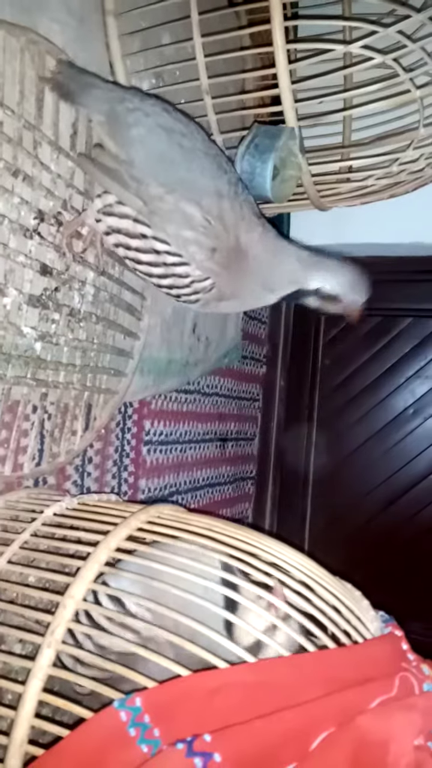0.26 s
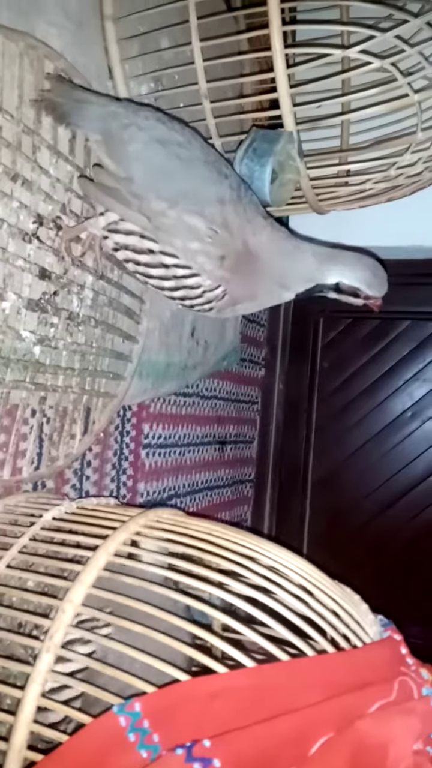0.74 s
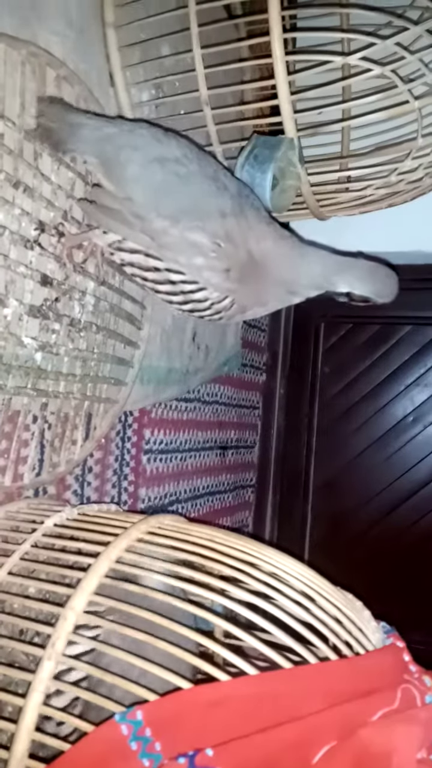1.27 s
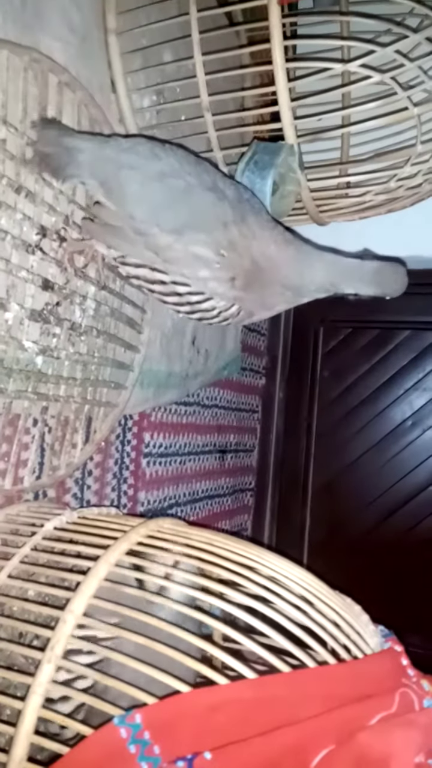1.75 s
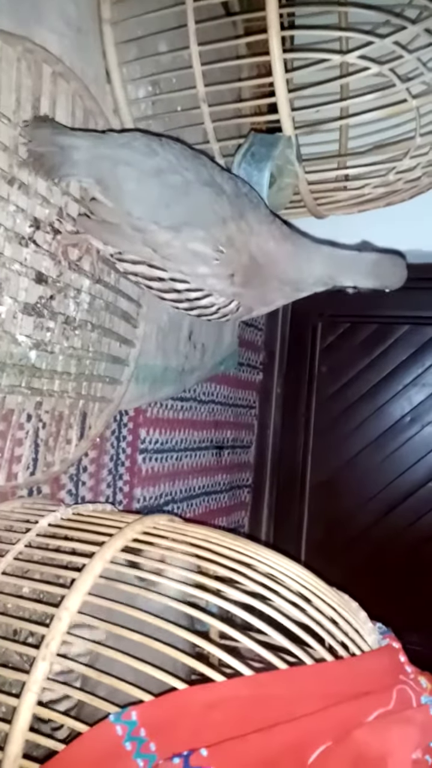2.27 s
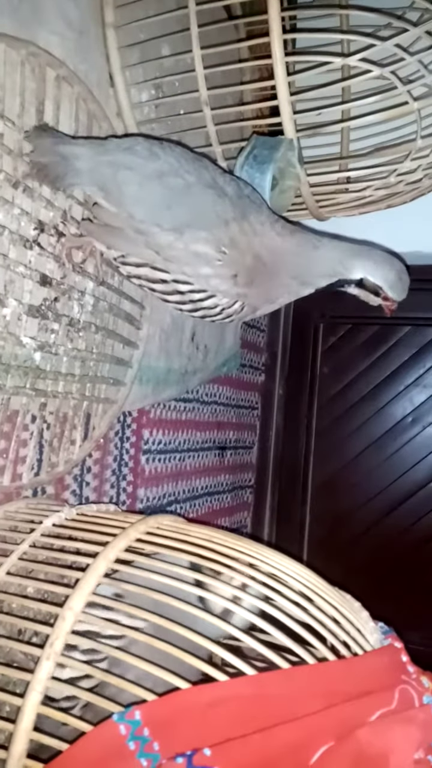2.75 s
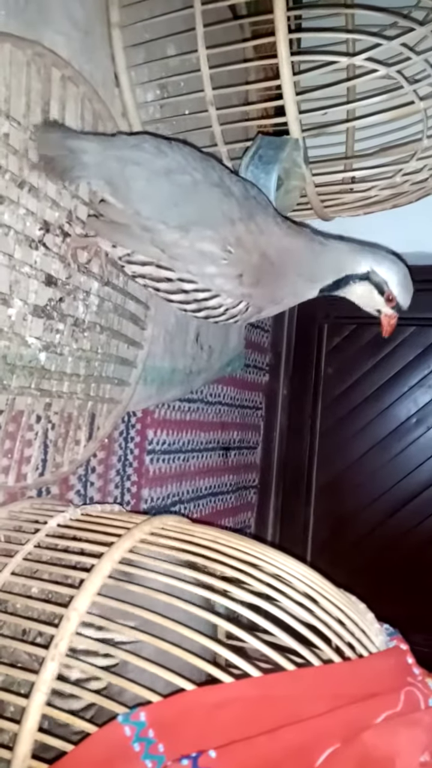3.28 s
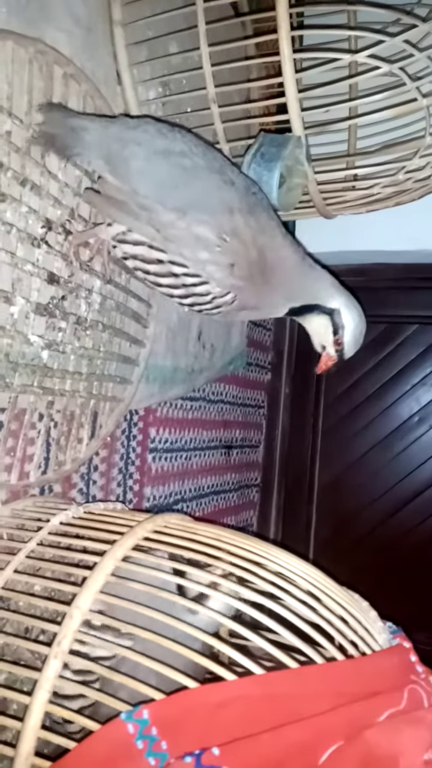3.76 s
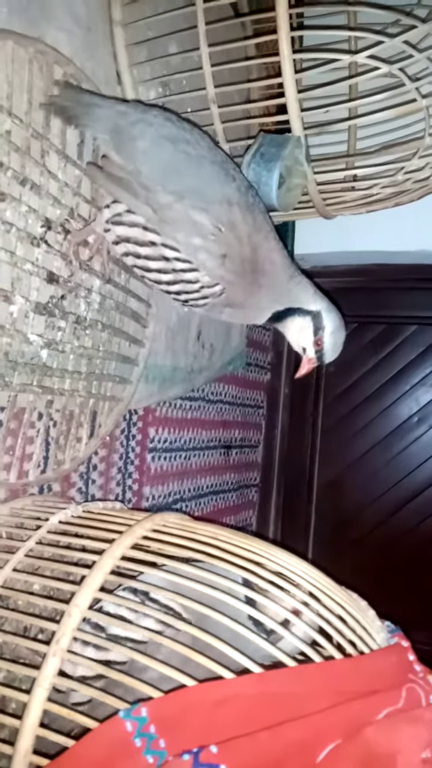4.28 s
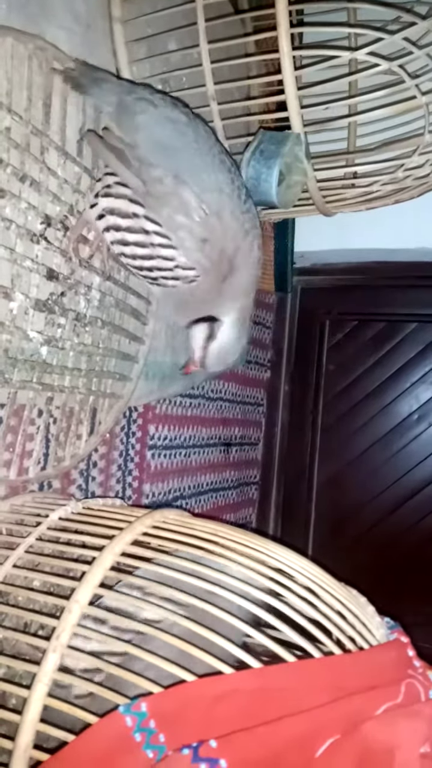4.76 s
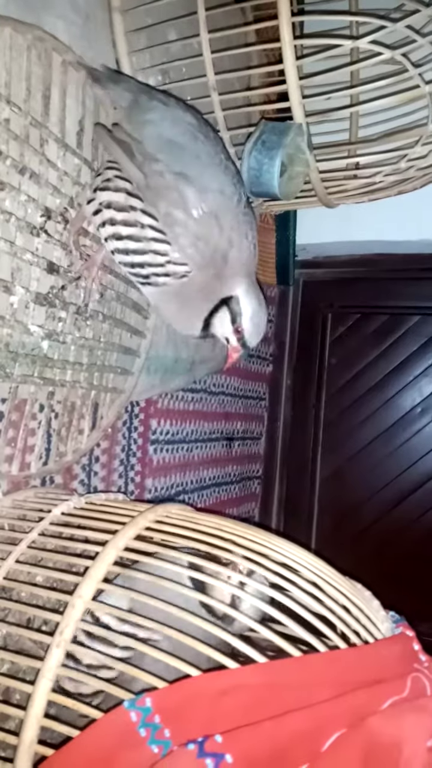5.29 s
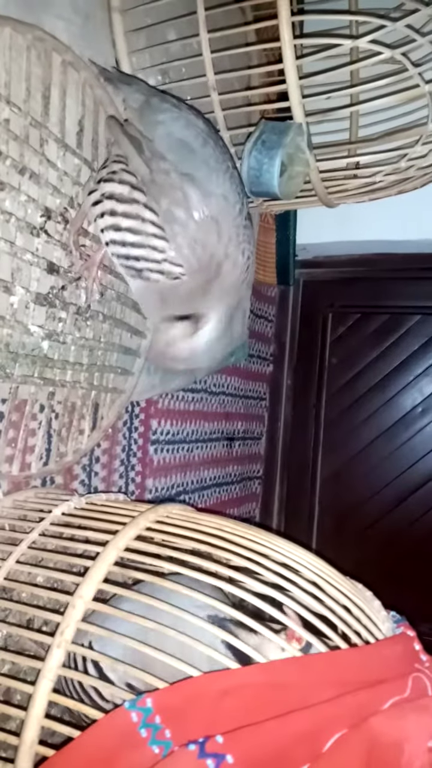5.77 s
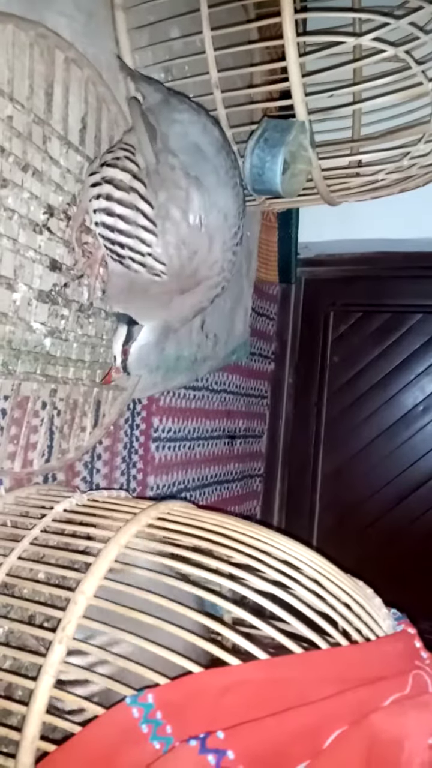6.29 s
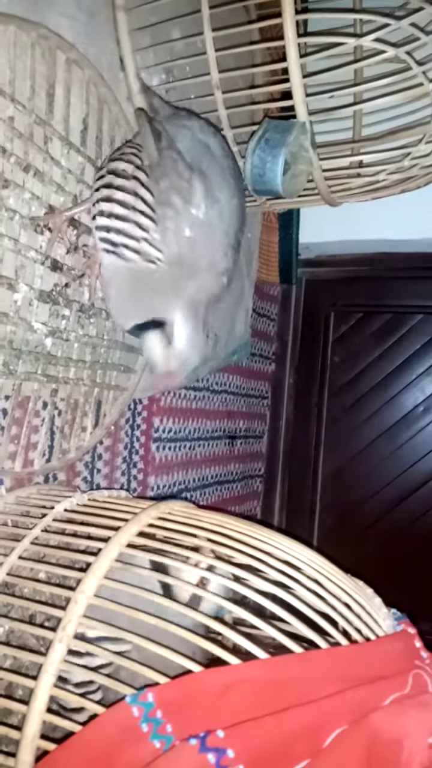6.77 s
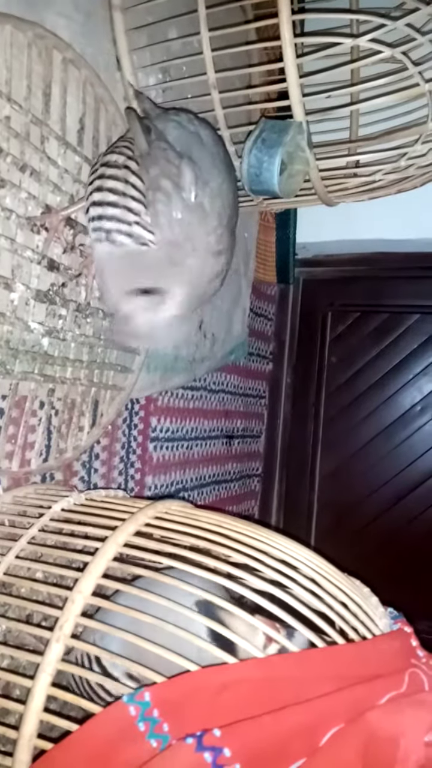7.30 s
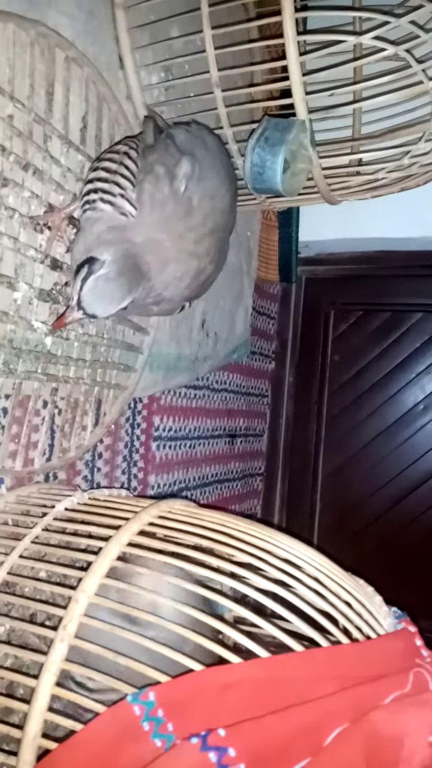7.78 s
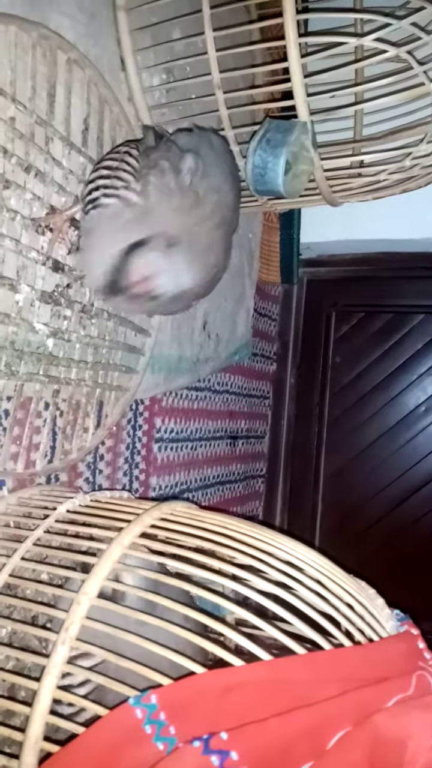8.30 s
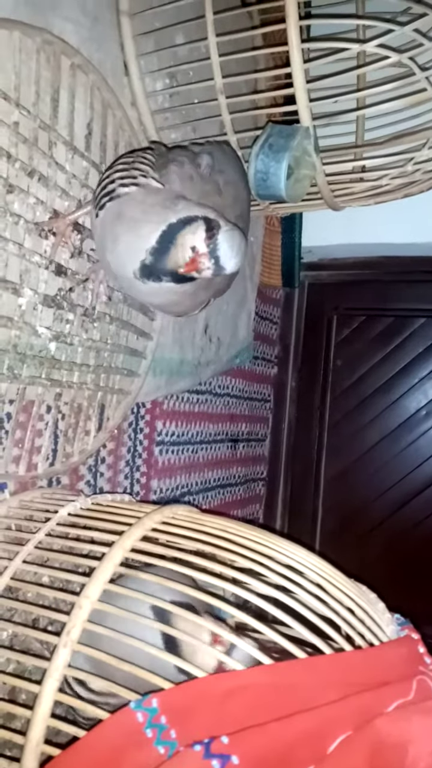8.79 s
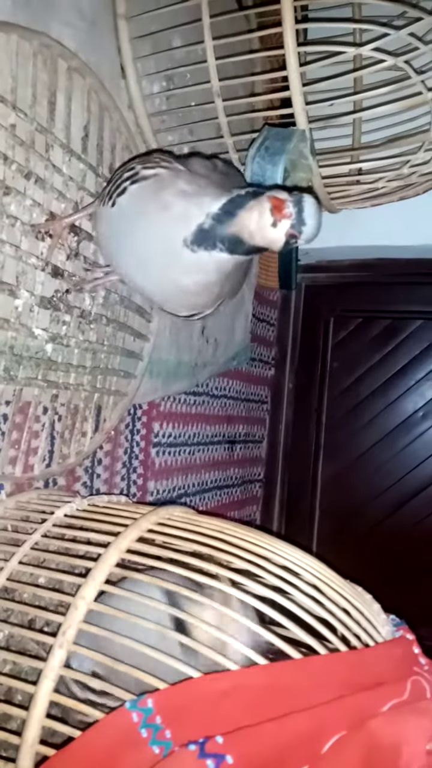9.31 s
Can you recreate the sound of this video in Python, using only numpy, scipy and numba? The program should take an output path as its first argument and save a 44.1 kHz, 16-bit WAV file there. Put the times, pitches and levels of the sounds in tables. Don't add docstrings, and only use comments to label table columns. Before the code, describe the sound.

A partridge clucks in a fast, rough run with short squeaky breaks, then slows and turns away into softer, duller clucks in a small room.

```python
import sys
import numpy as np
from scipy import signal
from scipy.io import wavfile
from scipy.ndimage import uniform_filter1d
from numba import njit

SR = 44100
rng = np.random.default_rng(int(sys.argv[2]) if len(sys.argv) > 2 else 0)


def materialize(psi):
    bounded = np.clip(np.atleast_2d(psi).T, -1, 1)
    quanta = np.round(bounded * 32767).astype(np.int16)
    wavfile.write(sys.argv[1], SR, quanta)


def voltage_ratio(decibels):
    exponent = np.asarray(decibels, float) / 20
    return 10 ** exponent


N = 420713

# (time [s], level [dB], length [s])
RUBS = [(0.298, -79.5, 0.5), (1.178, -74.5, 0.071), (1.684, -76.5, 0.066), (2.579, -76, 0.069),
        (3.185, -73, 0.068), (3.595, -78, 0.049), (4.774, -82, 0.089), (5.799, -79.5, 0.15),
        (8.046, -89, 0.12), (8.383, -81, 0.13), (8.595, -74.5, 0.11), (9.097, -84, 0.09), (9.417, -79, .12)]
# (time [s], peak level [dB], cane pitch [Hz])
TICKS = [(1.305, -59.5, 3180), (2.589, -53.5, 2190), (3.601, -48, 4070), (6.585, -62, 4500),
         (7.559, -59.5, 3279), (7.59, -53, 3980), (7.905, -61.5, 2839), (7.856, -68, 2580),
         (8.011, -52, 1820), (8.376, -59.5, 2200), (8.415, -54, 1574), (8.48, -68.5, 1503),
         (8.625, -52, 4400)]
KNOCK_S, KNOCK_DB, KNOCK_HZ = 4.594, -36.5, 320

# (time [s], cluck treble as the beak turns away [dB], squeal treble with the beak agape [dB], cluck
# pitch [Hz])
FACING = [
    (0, -21.5, -23, 595.9),
    (2.199, -21, -26, 601.7),
    (4.201, -20.5, -21.5, 599.4),
    (4.9, -31.5, -22, 659.9),
    (5.6, -34.5, -16.5, 658.4),
    (6.7, -24, -27, 615),
    (7.2, -38, -15.5, 516.4),
    (8.202, -36.5, -31, 521),
    (9.5, -36.5, -36, 501),
]
# (centre [Hz], width [Hz], level [dB])
BEAK = [(2393, 850, -10), (3250, 640, -4), (4048, 650, -2.5), (5140, 600, 3), (5800, 700, 4),
        (7355, 450, 7.5)]
# (time [s], chest [Hz], chest level [dB], narrow windpipe ring [dB], depth of gap under beak bands [0-1])
THROAT = [(0, 855, 4, -2.5, 0.8), (.7, 870, 2.5, -3, 1), (1.4, 878, 3.5, -11.5, 0.74),
          (2.2, 856.1, 4, -8.5, .7), (3, 846, 5, -8.5, 0.87), (3.7, 853.2, 3.5, -7, .7),
          (4.3, 849.5, 3, -8.5, 0.87), (5, 804, -4, -8, 0.49), (5.5, 798.8, -0.5, -3, 0.48),
          (5.9, 899.4, -2.5, -13, 0.69), (6.6, 801, 1.5, -8, 0.29), (7.039, 758.7, -3, -8.5, .4),
          (7.15, 726, 6.5, -2, 0.4), (7.6, 722, 3, -11, 0.23), (8.15, 780.3, 2, -6.5, 0.19),
          (8.3, 760, 6, -21.5, 0.22), (8.7, 758.6, 8, -6, 0.19), (9.5, 798.3, 1.5, -3.5, .4)]
# (time [s], centre [Hz], level [dB], strength of the fundamental [dB])
MOUTH = [(0, 2320, -22.5, -7), (2, 2337, -17, -6), (3, 2349, -22.5, -8), (4, 2902, -27.5, -10),
         (5.501, 2917, -26.5, -5), (6.6, 3000, -22, -3), (7.03, 3100, -19, -8.5),
         (7.15, 2797, -19.5, -15.5), (7.42, 2206, -12, -14), (7.55, 2600, -26.5, -6.5),
         (8.2, 2272, -18, -7.5), (8.6, 2404, -20.5, -7.5), (8.96, 2850, -20, -10.5), (9.1, 2897, -22, -7.5),
         (9.4, 3143, -22.5, -11), (9.5, 3005, -26, -4.5)]

# (start [s], rise [s], fall [s], peak level [dB],
# windpipe at the peak [Hz])
RUN_CLUCKS = [ (.002, 0.026, 0.017, -30.5, 1250), (.097, 0.0035, 0.021, -39.5, 1915),
              (0.179, 0.015, 0.027, -29, 1574), (.215, .012, 0.044, -44.5, 1596),
              (0.279, 0.024, 0.016, -27.5, 1387), (.461, 0.028, 0.0065, -31, 1759),
              (.54, 0.0024, 0.019, -45.5, 1650), (.565, 0.073, 0.025, -33, 1190),
              (.802, 0.015, .035, -32, 1600), (.84, .015, .02, -38.5, 1557), (.87, 0.031, 0.012, -36, 1242),
              (1.057, 0.0025, 0.047, -35, 1714), (1.155, 0.051, .01, -31, 1276),
              (1.214, 0.028, 0.0093, -30, 1360), (1.391, 0.016, 0.05, -27, 1556),
              (1.463, 0.025, 0.017, -32.5, 1327), (1.65, 0.021, 0.021, -36, 1915),
              (1.762, 0.0052, 0.034, -34, 1735), (1.797, 0.038, 0.016, -29, 1277),
              (1.988, 0.01, 0.05, -33.5, 1591), (2.04, .013, 0.0078, -31, 1787),
              (2.085, .024, 0.02, -32, 1252), (2.278, 0.017, .02, -33, 1217),
              (2.378, 0.0085, 0.062, -44, 1716), (2.437, 0.025, 0.017, -35, 1197),
              (2.603, .012, .022, -39, 1701), (2.66, 0.0028, 0.035, -37, 1900),
              (2.73, 0.045, .022, -30.5, 1252), (2.947, 0.016, 0.028, -33.5, 1218),
                 (3.047, 0.076, .018, -29, 1253), (3.289, 0.018, 0.027, -32.5, 1704),
                 (3.384, 0.045, 0.02, -27, 1283), (3.594, 0.017, 0.016, -31.5, 1650),
                 (3.696, 0.052, .012, -29.5, 1507), (3.754, 0.024, 0.014, -23, 1288),
                 (3.932, 0.016, 0.003, -42, 1772), (4.0, 0.0022, 0.033, -37.5, 1459),
                 (4.045, 0.059, 0.02, -26, 1345), (4.278, 0.011, 0.027, -36.5, 1671),
                 (4.42, 0.0032, 0.024, -34, 1550), (4.622, 0.016, 0.02, -37.5, 1516),
                 (4.729, 0.012, 0.017, -34.5, 1470), (4.986, 0.017, 0.017, -40.5, 1629),
                 (5.169, 0.0024, 0.028, -36, 1522), (5.203, 0.016, .016, -43.5, 1452),
                 (5.424, 0.014, 0.016, -39.5, 1655), (5.586, 0.0023, 0.014, -34.5, 1499),
                 (5.845, 0.014, 0.019, -36.5, 908), (6.03, 0.0029, 0.016, -38.5, 1456),]
# (start [s], rise [s], fall [s], peak level [dB], windpipe at the peak [Hz])
SOFT_CLUCKS = [ (6.336, .003, .02, -36, 1826), (6.545, .018, 0.024, -47, 1899),
               (6.731, .016, 0.0073, -45.5, 1221), (7.0, .016, .03, -41, 1701),
               (7.035, .015, .022, -40.5, 1542), (7.1, .006, 0.07, -44.5, 1527),
               (7.407, .014, 0.025, -41, 1450), (7.503, 0.011, 0.044, -45, 1437),
               (7.556, .035, 0.037, -50.5, 1303), (8.117, .022, .014, -44.5, 1776),
               (8.248, 0.037, 0.036, -46, 1680), (8.513, .008, 0.037, -46.5, 1730),
               (8.604, 0.022, 0.068, -43.5, 1662), (8.683, .022, .018, -46, 1204),
               (8.945, .013, 0.018, -39.5, 1540), (9.03, 0.0058, 0.072, -43.5, 1436),
               (9.09, .043, 0.019, -43.5, 1323), (9.336, 0.025, 0.012, -43, 1528),
               (9.431, 0.016, 0.05, -44.5, 1526), (9.47, .058, 0.014, -39, 1430), ]
# (start [s], rise [s], fall [s], peak level [dB], windpipe at the peak [Hz])
GRUNTS = [ (.35, 0.0052, 0.029, -53, 1384), (1.626, 0.0071, 0.015, -46, 1650),
          (3.859, .018, 0.0099, -47, 1445), (4.49, 0.0045, 0.02, -56, 1601),
          (4.8, 0.008, 0.031, -47.5, 1753), (5.242, 0.0066, 0.023, -53.5, 1791),
          (6.096, .006, 0.024, -57, 1412), (6.805, 0.021, 0.016, -55.5, 1315),
          (7.165, 0.017, .018, -52, 1261), (8.3, 0.016, 0.028, -48, 1506), ]
# (start [s], rise [s], fall [s], peak level [dB], windpipe at the peak [Hz])
OPEN_CLUCKS = [
    (7.8, .034, .016, -44, 1800),
    (7.85, .014, .012, -53, 1593),
    (8.198, .026, 0.034, -43, 1896),
    (9.377, 0.022, 0.052, -43.5, 1940),
]

# (start [s], length [s], from [Hz], to [Hz], level [dB])
CLIMBS = [ (.048, .012, 1479, 1757, -34), (.059, .011, 1799, 2110, -22.5), (.488, 0.02, 1752, 1934, -21),
          (1.003, 0.02, 1593, 1941, -28.5), (1.028, 0.011, 1692, 2100, -29), (1.722, .017, 1684, 1887, -25),
          (2.614, 0.016, 1650, 1993, -27), (3.331, 0.021, 1650, 2130, -31),
          (3.945, 0.027, 1717, 1705, -25.5), (4.365, 0.023, 1585, 1780, -38.5),
          (4.628, 0.023, 2205, 2382, -33), (4.65, 0.021, 1650, 1834, -29), (5.085, .013, 1401, 2053, -30),
          (5.511, 0.00889, 1408, 2092, -40.5), (5.52, .015, 2405, 2647, -33.5),
          (5.942, 0.026, 1542, 2195, -39.5), (6.234, 0.01, 1354, 1864, -28), (6.246, 0.02, 1877, 2115, -29),
          (6.65, 0.024, 1602, 2002, -36), (8.976, 0.017, 1410, 1898, -39.5), ]
# (start [s], length [s], from [Hz], to [Hz], level [dB])
ARCHES = [ (0.068, 0.028, 3050, 2810, -39.5), (.511, 0.007, 3100, 3126, -39),
          (1.74, 0.01408, 3449, 2857, -35.5), (1.756, 0.01312, 2901, 3452, -39),
          (3.351, .016, 3680, 2796, -39.5), (3.366, .015, 2800, 3610, -40.5),
          (3.971, 0.025, 2881, 2770, -39), (4.386, 0.027, 2902, 2551, -35.5),
          (4.674, 0.051, 3667, 4330, -47.5), (5.098, 0.024, 2700, 3250, -31),
          (5.123, .011, 3397, 4753, -46.5), (5.141, 0.024, 4666, 2904, -46.5),
          (5.538, 0.015, 2802, 3202, -40), (5.553, 0.0096, 4408, 4360, -47.5),
          (5.562, 0.013, 3195, 2860, -39.5), (5.964, 0.011, 3300, 3755, -44.5),
          (5.978, .035, 3750, 3650, -54), (6.016, .007, 3600, 1898, -45), (6.269, 0.019, 3064, 3135, -48),
          (6.289, .028, 3850, 3958, -51), (6.316, 0.0077, 3800, 2287, -39.5),
          (6.675, 0.0188, 2577, 3063, -34), (6.698, 0.0233, 3429, 2824, -39.5),
          (8.991, .02, 2650, 3120, -57), (9.01, .018, 3120, 2293, -56), ]
# (start [s], length [s], from [Hz], to [Hz], level [dB])
DROPS = [ (.093, 0.027, 2608, 800, -38.5), (.517, 0.023, 2002, 1485, -24.5), (1.045, 0.02, 1876, 1650, -31),
         (1.769, 0.017, 1996, 1639, -34.5), (2.632, .03, 1957, 1604, -24.5),
         (3.382, 0.0082, 2793, 2008, -42.5), (3.996, 0.01, 2141, 2212, -35.5),
         (4.413, .013, 1986, 1598, -32), (4.727, 0.008, 2903, 2096, -40.5),
         (5.162, 0.01, 2303, 1601, -33.5), (5.574, .017, 2377, 1553, -33),
         (6.021, 0.017, 1785, 1250, -34.5), (6.324, 0.014, 2188, 1772, -28),
         (6.722, 0.015, 2293, 1307, -30), (9.026, 0.015, 1995, 1418, -40), ]
# (start [s], length [s], from [Hz], to [Hz], level [dB])
DUETS = [(1.0, 0.023, 2100, 2702, -40.5), (1.029, 0.024, 3003, 2900, -44.5),
         (1.752, 0.017, 2036, 2255, -31.5), (4.4, .02, 3307, 3606, -49), (4.63, 0.023, 1251, 1498, -44),
         (4.658, 0.027, 3355, 3507, -41), (4.676, 0.012, 2300, 3000, -42),
         (5.099, 0.015, 1856, 2003, -37.5), (5.429, 0.024, 1203, 1857, -42.5),
         (5.515, 0.015, 3220, 3407, -41), (5.592, 0.0081, 2150, 2098, -32.5),
         (6.268, 0.048, 2000, 1950, -55), (6.323, 0.027, 3260, 2899, -45), (6.66, 0.036, 1437, 1511, -43),
         (6.7, .015, 4385, 4110, -48.5), (8.972, .02, 1906, 2702, -53)]
# (start [s], length [s], from [Hz], to [Hz], level [dB])
SONGS = [ (.018, 0.019, 1397, 1254, -31), (.29, .024, 1600, 1346, -27), (.635, 0.026, 1402, 1263, -33),
         (.892, .013, 1352, 1145, -29.5), (.907, 0.0079, 1200, 1153, -32), (1.2, 0.0089, 1261, 1246, -31),
         (1.222, 0.025, 1560, 1300, -30), (1.482, .024, 1450, 1195, -31.5),
         (1.81, 0.029, 1400, 1276, -30.5), (2.0, .025, 1660, 1640, -33.5), (2.103, .012, 1351, 1300, -26),
         (2.116, 0.0091, 1333, 1294, -26.5), (2.45, .009, 1361, 1340, -30.5), (2.46, .012, 1281, 1235, -27),
         (2.773, 0.022, 1319, 1277, -31), (3.117, .022, 1398, 1306, -26.5),
         (3.423, .018, 1351, 1297, -27.5), (3.738, .012, 1498, 1448, -28),
         (3.765, 0.021, 1421, 1298, -28.5), (4.05, .023, 1957, 1909, -38.5),
         (4.073, .015, 1901, 1738, -28.5), (4.094, .009, 1880, 1781, -30.5),
         (4.103, .015, 1424, 1475, -24.5), (4.118, 0.0075, 1355, 1180, -31.5),
         (4.425, .02, 1600, 1050, -37.5), (4.736, .018, 1899, 1200, -36), (5.171, .02, 1601, 1150, -39),
         (5.518, .016, 1700, 1911, -37), (5.588, .013, 1500, 1000, -36.5), (6.736, .017, 1550, 1000, -38),
         (7.565, .045, 1550, 1147, -53.5), (7.58, .04, 1998, 1600, -54), (9.38, 0.051, 1495, 1300, -45.5),
         (9.515, .024, 1698, 1451, -41.5), ]
# (attack share, release share, onset [dB], end [dB], pitch ratio kept at the end)
CLIMB, ARCH, DROP = (1.6, 0.3, -14.5, -9, 0.99), (0.44, 0.2, -7.5, -8, 1), (0.6, 0.5, -7.5, -11.5, 1)
DUET, SONG = (1.8, 1.2, -9.5, -10.5, 1), (1.2, 0.6, -10.5, -11, 0.54)

PIPE_REST_HZ, PIPE_PULL, PIPE_SAG = 1650, 0.79, 0.87
ONSET_DB, END_DB = -21.5, -19.5
SURGE_S, SWELL_DB = 0.023, -10
HOLD_SHARE, HOLD_DB = 0.55, -5.5
CHEST_EVEN_DB, CHEST_LAG, CHEST_MOST_DB = -49, 1, 4.5
GRUNT_CHEST_DB, CHEST_ONSET_DB = -2.5, -6.5
TIGHT_CHEST_DB = -3.5
GRUNT_PITCH, TIGHT_PITCH = 0.83, 1.1
OPEN_CHEST_DB, OPEN_BEAK_DB = -5.5, 6.5
ROUGH_FULL_DB, ROUGH_LAG = -33, 0.6
BEAK_FULL_DB, BEAK_SHARE = -36.5, 0.71


@njit
def svf(x, hz, width):
    y, b, l = np.empty(len(x)), 0., 0.
    for i in range(len(x)):
        g, k = np.tan(np.pi * hz[i] / SR), width / hz[i]
        v = (b + g * (x[i] - l)) / (1 + g * (g + k))
        b, l, y[i] = 2 * v - b, l + 2 * g * v, k * v
    return y


def band(x, hz, width):
    hz = hz * np.ones(N)
    return svf(svf(x, hz, 1. * width), hz, 1. * width)


def highpass(x, hz, order=4):
    return signal.sosfilt(signal.butter(order, hz, "highpass", fs=SR, output="sos"), x)


def even(x, s=0.0042):
    return x / np.sqrt(uniform_filter1d(x ** 2, int(s * SR)) + 1e-18)


def walk(rate):
    k = int(SR / rate)
    return 1.3 * uniform_filter1d(np.repeat(rng.standard_normal(N // k + 1), k), k)[:N]


def follow(table):
    s, *columns = np.transpose(table)
    return [np.interp(np.arange(N) / SR, s, c) for c in columns]


def floor():
    t, noise = np.arange(N) / SR, rng.standard_normal((3, N))
    hand = voltage_ratio(-96 + 3 * walk(9))
    for s, db, length in RUBS:
        hand = hand + voltage_ratio(db) * np.sin(np.pi * np.clip((t - s) / length, 0, 1))
    rub = hand * even(band(noise[0], 150, 150), 0.069)
    hum = voltage_ratio(-86.5) * even(band(noise[1], 1500, 6600), 0.5)
    hiss = voltage_ratio(-94.0) * even(band(noise[2], 14500, 11000), 0.5)
    return rub + hum + hiss


def room(x, low_t60=0.4, high_t60=0.32, split_hz=2600, first_s=0.009):
    t, noise = np.arange(SR // 2) / SR, rng.standard_normal(SR // 2)
    low = signal.sosfilt(signal.butter(2, split_hz, fs=SR, output="sos"), noise)
    high = noise - low
    tail = (low * voltage_ratio(-60 * t / low_t60) + high * voltage_ratio(-60 * t / high_t60)) * (t > first_s)
    return signal.fftconvolve(x, tail / np.sqrt(np.sum(tail ** 2)))[:N]


def phone_knock():
    t, knock = np.arange(SR // 20) / SR, np.zeros(N)
    ring = np.sin(2 * np.pi * KNOCK_HZ * t) * np.exp(-t / 0.0013)
    knock[int(KNOCK_S * SR):][:len(t)] = voltage_ratio(KNOCK_DB) * ring
    return highpass(knock, 130, 2)


def wicker():
    bursts, hz = np.zeros(N), np.interp(np.arange(N) / SR, *np.transpose(TICKS)[::2])
    t = np.arange(SR // 20) / SR
    for s, db, _ in TICKS:
        bursts[int(s * SR):][:len(t)] = voltage_ratio(db) * np.exp(-t / 0.0076)
    crack = rng.standard_normal(N)
    body = even(band(band(crack, hz, 1800), hz, 1800))
    snap = even(band(crack, 1.5 * hz, 3200))
    return bursts * (body + voltage_ratio(-11.5) * snap)


def play(notes, fade_s):
    notes = [np.array(note) for note in sorted(notes)]
    t, columns = np.arange(N) / SR, np.outer(notes[0][0][1:], np.ones(N))
    gain, top_db, age, left = np.zeros(N), np.full(N, -40.), np.zeros(N), np.ones(N)
    starts = [int(note[0, 0] * SR) for note in notes] + [N]
    for note, a, after in zip(notes, starts, starts[1:]):
        b = min(int(note[-1, 0] * SR), N)
        gain[a:b] = np.maximum(gain[a:b], np.interp(t[a:b], note[:, 0], voltage_ratio(note[:, 2])))
        top_db[a:after] = note[:, 2].max()
        age[a:b], left[a:b] = t[a:b] - t[a], t[b - 1] - t[a:b]
        columns[:, a:after] = [np.interp(t[a:after], note[:, 0], c) for c in note.T[1:]]
    columns = uniform_filter1d(columns, int(0.0008 * SR))
    return columns, uniform_filter1d(gain, int(fade_s * SR)), top_db, age, left


def beak(x, facing):
    out = 0
    for hz, width, db in BEAK:
        moving_hz = hz * (1 + 0.038 * walk(14))
        beam = facing ** ((hz - 1500) / 2500)
        ring = even(band(band(x, moving_hz, width), moving_hz, width))
        out = out + voltage_ratio(db + 3.67 * walk(40)) * beam * ring
    return out


def glide(row, register):
    s, length, from_hz, to_hz, db = row
    attack, release, onset_db, end_db, kept = register
    attack = min(attack, 0.95 - release)
    at = lambda share: (s + share * length, from_hz + share * (to_hz - from_hz))
    return [(*at(0), db + onset_db), (*at(attack), db), (*at(1 - release), db),
            (s + length, to_hz * kept, db + end_db)]


def membrane(parts, wobble=0.018, flutter_db=2.0, second_db=-28, half_db=-18, rasp=0.36, rasp_hz=520):
    (hz, _), gain, *_ = play(parts, fade_s=0.0014)
    phase = 2 * np.pi * np.cumsum(hz * (1 + wobble * (walk(600) + walk(120)))) / SR
    tone = np.sin(phase) + voltage_ratio(second_db + 2.8 * walk(160)) * np.sin(2 * phase)
    halves = voltage_ratio(-14.0) * np.sin(phase + phase / 2) + voltage_ratio(-8.5) * np.sin(phase / 2)
    tone += voltage_ratio(half_db + 7.2 * walk(60)) * halves
    flap = np.sin(2 * np.pi * np.cumsum(rasp_hz * (1 + 0.23 * walk(200))) / SR)
    flutter = voltage_ratio(flutter_db * walk(220)) * (1 + rasp * flap)
    return gain * tone * np.sqrt(2) * flutter, gain, flap


def squeals(facing, hiss_db=-19):
    low_notes = [glide(row, CLIMB) for row in CLIMBS] + [glide(row, DROP) for row in DROPS]
    low, low_gain, flap = membrane(low_notes, flutter_db=1.4, rasp=0.26)
    thin, thin_gain, _ = membrane([glide(row, ARCH) for row in ARCHES], half_db=-24, rasp=0.22)
    duet = membrane([glide(row, DUET) for row in DUETS])[0]
    song = membrane([glide(row, SONG) for row in SONGS], wobble=0.022, half_db=-25, flutter_db=1.17,
                    rasp=0.46, rasp_hz=210)[0]
    air = rng.standard_normal(N)
    push = np.roll(uniform_filter1d(low_gain + thin_gain, 350).clip(0), SR // 400)
    throat_air = voltage_ratio(-19.0) * even(band(air, 1850, 260))
    spray = voltage_ratio(-10 + 3.6 * walk(55)) * np.sqrt(push / voltage_ratio(-35.0)) * facing ** 1.54 * (1 + flap)
    spray = spray * even(band(band(air, 12000, 7900), 12000, 7900))
    jet = beak(air, facing) + throat_air + spray
    whistle = highpass(low + thin + duet + song, 800)
    return whistle + np.sqrt(push) * voltage_ratio(hiss_db) * jet


def cluck_shape(row, extra_db=0, pitch=1, open_db=0):
    s, rise, fall, db, hz = row
    db = db - ROUGH_LAG * max(db - ROUGH_FULL_DB, 0)
    from_hz = hz + PIPE_PULL * min(rise / SURGE_S, 1) * (PIPE_REST_HZ - hz)
    peak_s = s + rise
    swell = [(peak_s - SURGE_S, from_hz, db + SWELL_DB)] * (rise > 0.04)
    rows = [(s, from_hz, db + ONSET_DB), *swell, (peak_s, hz, db),
            (peak_s + HOLD_SHARE * fall, hz, db + HOLD_DB), (peak_s + fall, hz * PIPE_SAG, db + END_DB)]
    if rise < 0.0052 and pitch == 1:
        extra_db, pitch = TIGHT_CHEST_DB, TIGHT_PITCH
    shaped = []
    for point in rows:
        chest_db = min(CHEST_LAG * (CHEST_EVEN_DB - point[2]), CHEST_MOST_DB) + extra_db
        chest_db += CHEST_ONSET_DB * (point[0] == s)
        shaped.append((*point, chest_db, pitch, open_db))
    return shaped


def throat_pulses(hz, jitter=0.055, shimmer_db=2.5, weak_db=-5, breath=0.16):
    phase = np.cumsum(hz * (1 + jitter * (walk(350) + walk(60))) / SR)
    cycle = phase.astype(int)
    size = voltage_ratio(shimmer_db * rng.standard_normal(N // 20)[cycle] + weak_db * (cycle % 2))
    shut = np.exp(-(phase % 1) / 0.041)
    hiss = breath * np.exp(-(phase % 1) / 0.6) * rng.standard_normal(N)
    return np.diff(size * (shut + hiss), prepend=0)


def clucks(facing, start_hz, effort=0.12, sag=0.8, dive=4.0, slack=2.5):
    notes = [cluck_shape(row) for row in RUN_CLUCKS + SOFT_CLUCKS]
    notes += [cluck_shape(row, GRUNT_CHEST_DB, GRUNT_PITCH) for row in GRUNTS]
    notes += [cluck_shape(row, OPEN_CHEST_DB, open_db=OPEN_BEAK_DB) for row in OPEN_CLUCKS]
    chest_hz, fill_db, ring_db, gap = follow(THROAT)
    gap = gap.clip(0, 1)
    mouth_hz, mouth_db, base_db = follow(MOUTH)
    (pipe_hz, _, chest_db, pitch, open_db), gain, top_db, age, left = play(notes, fade_s=0.005)

    hz = start_hz * pitch * voltage_ratio(effort * np.minimum(top_db + 43, 0))
    long_pipe = np.minimum(PIPE_REST_HZ / pipe_hz, 1.35) ** slack
    let_go = dive * np.minimum(age / 0.055, 1) * long_pipe * np.exp(-left / 0.015)
    hz = hz * np.exp(-age * (sag + let_go))
    source = throat_pulses(hz)

    sing_db = ring_db - 8 * (pitch > 1.1) + 2.0 * walk(90) + 0.21 * (top_db + 28.5)
    sing = voltage_ratio(sing_db) * even(band(source, pipe_hz, 130))
    broad = voltage_ratio(-0.5) * even(band(band(source, pipe_hz, 750), pipe_hz, 750))
    pipe = even(broad + sing, 0.0089)
    gain = gain * voltage_ratio(1.6 * walk(70) + 1.8 * walk(200))

    fundamental = even(band(band(source, hz, 240), hz, 240)) * voltage_ratio(base_db) / pitch ** 2.5
    chest_ring = band(band(source, chest_hz * (1 + 0.073 * walk(25)), 400), chest_hz, 800)
    chest = even(fundamental + even(chest_ring))

    held = np.maximum(gain / voltage_ratio(BEAK_FULL_DB), 1) ** (BEAK_SHARE - 1)
    beak_db = open_db + 0.31 * (np.minimum(chest_db, -4) + 6.5)
    voice = pipe + voltage_ratio(chest_db + fill_db - 1.38) * held ** 0.4 * chest
    voice = gain * (voice + held * voltage_ratio(beak_db) * beak(source, facing))
    cavity = even(band(band(source, mouth_hz * (1 + 0.03 * walk(30)), 440), mouth_hz, 530))
    cavity = gain * held * voltage_ratio(mouth_db + 2 * walk(45)) * cavity

    for gap_hz, width in ((2950., 850.0), (3400., 160.0)):
        voice = voice - gap * svf(voice, gap_hz * (1 + 0.044 * walk(12)), width)
    voice = voice - 0.84 * (1 - gap) * svf(voice, 1.2 * chest_hz, 300.0)
    voice = voice + cavity
    for _ in range(2):
        voice = voice - svf(voice, hz / 2, 170.0)
    return voice


def scene():
    cluck_db, squeal_db, start_hz = follow(FACING)
    bird = highpass(clucks(voltage_ratio(cluck_db), start_hz) + squeals(voltage_ratio(squeal_db)), 290)
    near = bird + wicker()
    return (near + voltage_ratio(-12.0) * room(near) + phone_knock() + floor())[None]


def top_cut(x):
    return signal.sosfilt(signal.butter(12, 15740, fs=SR, output="sos"), x)


def record(dry):
    top = 0.3
    rounded = top * np.tanh(dry / top)
    return top_cut(rounded)


dry = scene()
out = record(dry)
materialize(out)
```